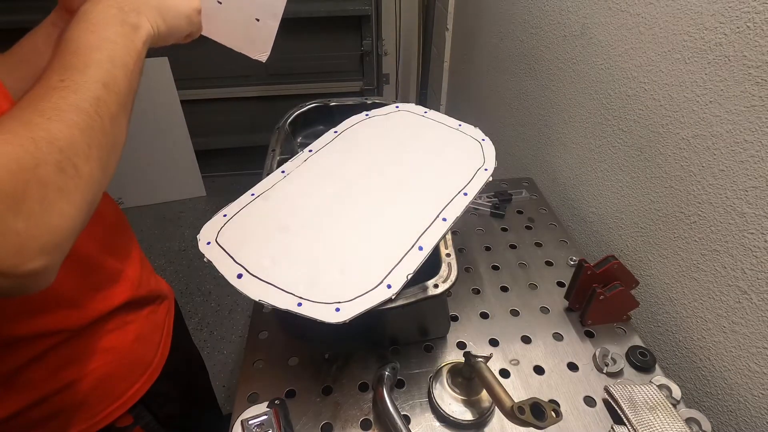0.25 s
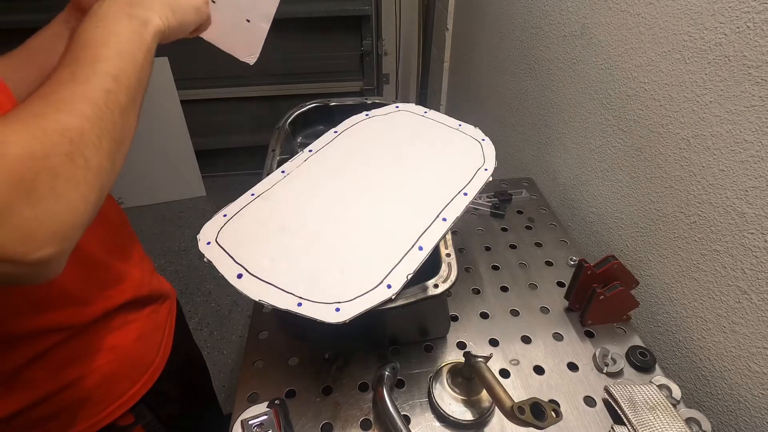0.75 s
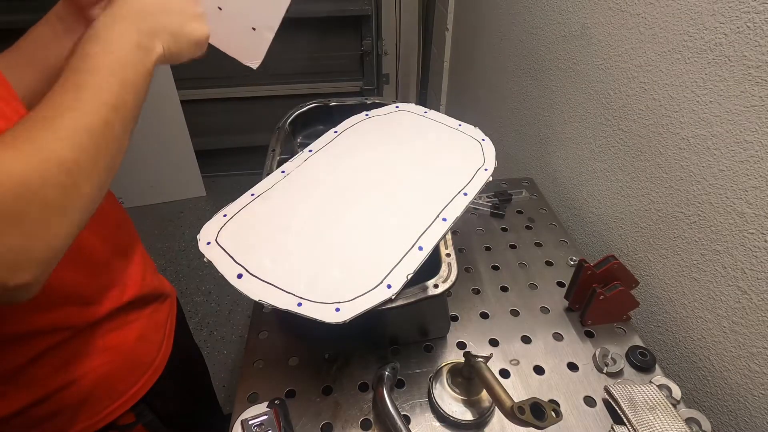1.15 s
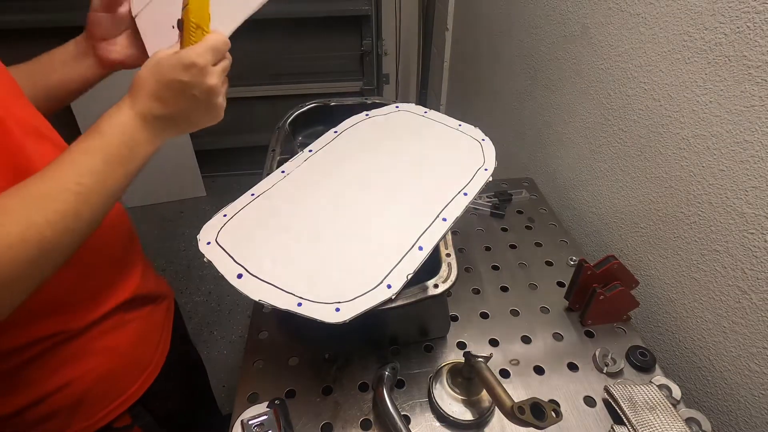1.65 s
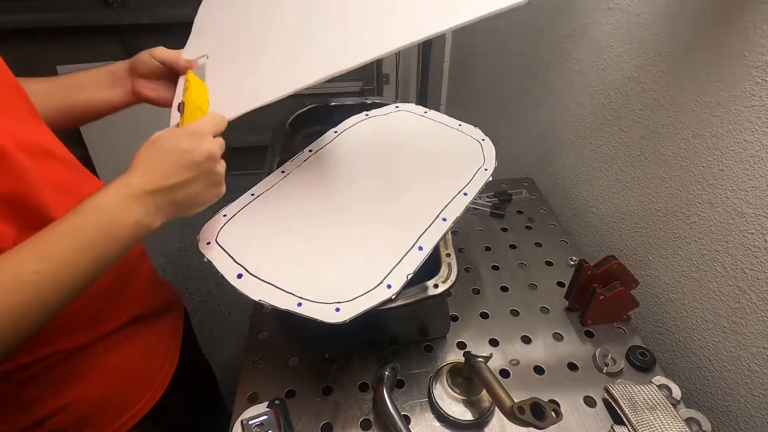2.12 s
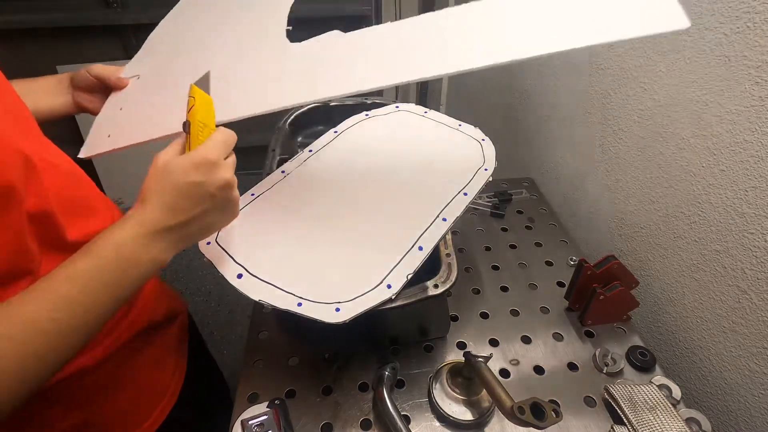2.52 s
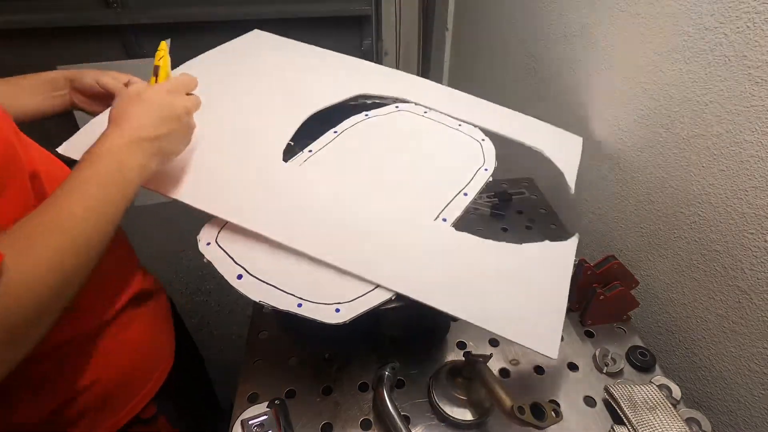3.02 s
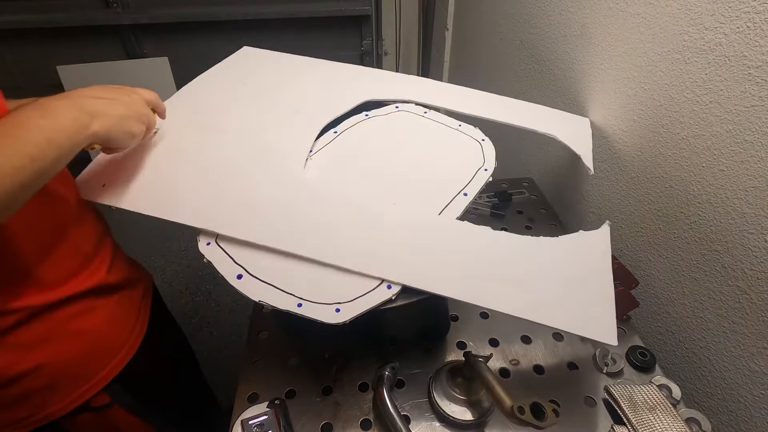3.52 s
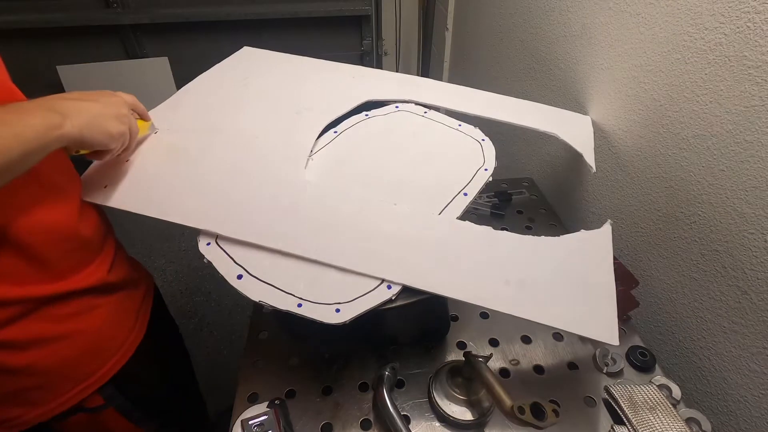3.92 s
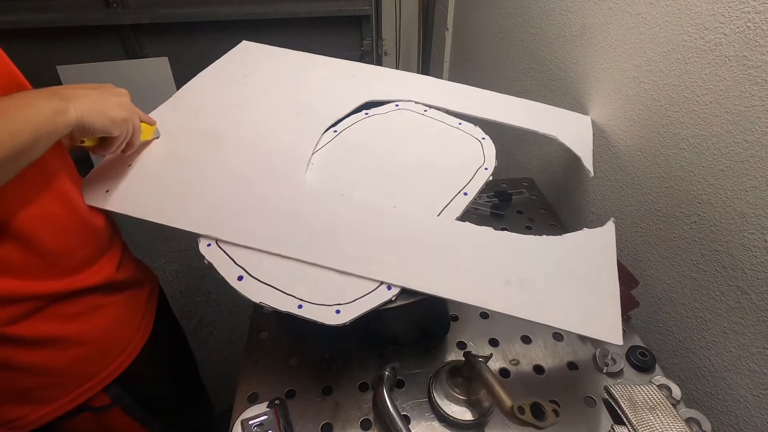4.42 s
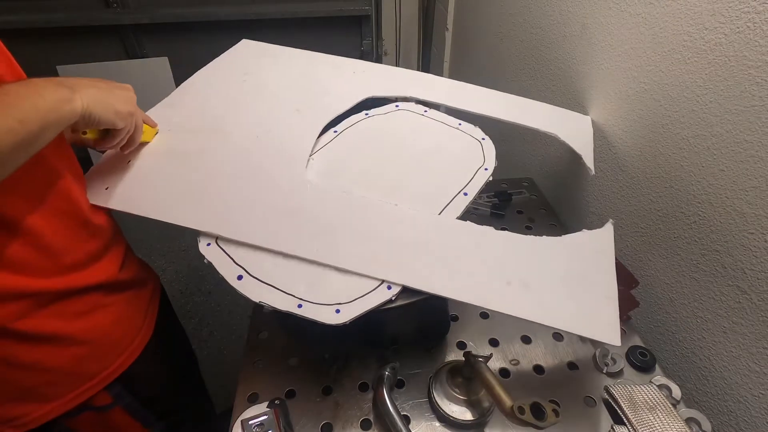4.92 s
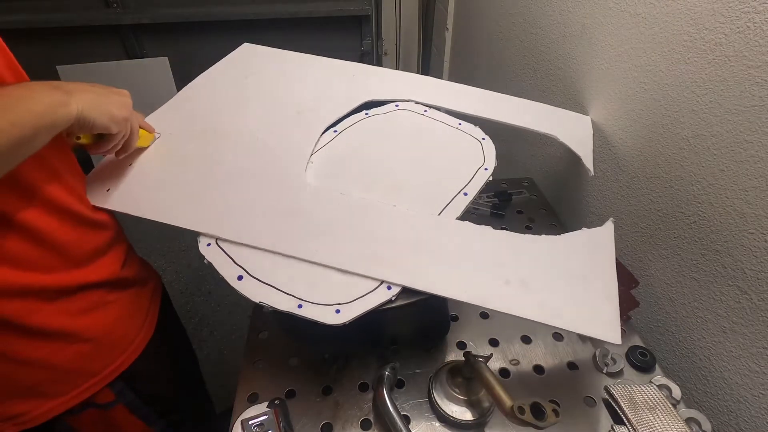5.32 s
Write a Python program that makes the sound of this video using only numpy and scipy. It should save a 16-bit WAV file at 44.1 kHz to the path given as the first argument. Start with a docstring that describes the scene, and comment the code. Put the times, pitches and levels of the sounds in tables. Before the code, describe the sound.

Close stereo pickup of a big cardboard sheet in a tight, lightly echoing garage: soft scuffs and crinkles first, one bright click, a loud floppy thump, then a rapid run of hollow slaps as it lands on a pan. Quiet rubbing and low dragging follow, ending with abrupt gritty knife strokes, crackles and dull knocks over a soft rumble.

```python
"""A large sheet of cardboard is bumped, lands on a metal oil pan and bounces: each blow is a sum of
decaying noise bursts (thud, slap, crack), coloured by the sheet's resonances.
Rubbing and tearing are random grains shaped by hand speed or by a stick-slip blade; snaps and ticks
are short bursts centred on one pitch. Low rumbling noise fills the small garage workshop, whose
echo is decaying noise, partly alike at two microphones."""
import sys
import numpy as np
from scipy import signal
from scipy.fft import rfft, irfft, next_fast_len
from scipy.io import wavfile
from scipy.ndimage import uniform_filter1d

SR = 44100
rng = np.random.default_rng(int(sys.argv[2]) if len(sys.argv) > 2 else 0)


def to_wav(s):
    """Save 16-bit WAV."""
    ch = np.atleast_2d(s).T  # columns
    pcm = np.round(np.clip(ch, -1, 1) * 32767)  # PCM
    wavfile.write(sys.argv[1], SR, pcm.astype(np.int16))


N = 244755
T = np.arange(N) / SR  # time axis in seconds
HZ = np.fft.rfftfreq(8192, 1 / SR)  # frequency grid of the filters

# All levels are relative; later gains and filters set the final balance.
# Background noise. Each row: frequency in Hz, power density in dB per Hz.
BACKGROUND_TONE = [(20, -20), (40, -3), (60, 3.5), (82, 8), (120, 0), (170, -9), (260, -17.5), (500, -38.5),
                   (1200, -34), (3000, -69), (8000, -48), (15000, -101)]
# Decay of the room echo. Each row: frequency in Hz, time to fall by 60 dB in seconds.
ROOM_T60 = [(80, 0.45), (300, 0.29), (1000, 0.43), (3000, 0.4047), (7000, 0.49), (14000, 0.24)]
# Coherence of the two microphones. Each row: frequency in Hz, left-right likeness (1 = identical).
LIKENESS = [(250, 0.98), (500, 0.74), (1000, 0.62), (2000, 0.44), (4000, 0.11), (11000, 0.083)]
# Colour difference of the microphones. Each row: frequency in Hz, left minus right in dB
# (before each side is scaled to unit energy).
BALANCE = [(100, 2.9), (500, 1.9), (1000, 2.2), (2000, 4.5), (4000, 4.5), (9000, 0.82), (18000, 0.89)]
# Resonances of the sheet. Each row: frequency in Hz, width in Hz, lift in dB when held in the air,
# lift in dB when resting on the pan.
SHEET_MODES = [(184.6, 220, 7, 2), (266.4, 54, -1.5, 8), (365.5, 90, 4.5, -8), (486, 89, 4, 2),
               (1200, 210, 6, -2), (1580, 110, 0, 2), (3500, 190, -2, 2)]

# Card gliding through the hands as it is lifted. Each row: time in seconds, level in dB.
LIFTING = [(0.0, -80), (0.12, -58), (0.26, -56.5), (0.33, -56.5), (0.7, -67), (0.98, -68), (1.24, -65.5),
           (1.72, -68.5), (1.87, -53.5), (2.0, -60)]
# Card gliding through the hands as it is laid down. Each row: time in seconds, level in dB.
LAYING = [(2.45, -103), (2.62, -74), (2.83, -49.5), (3.01, -55.5), (3.55, -54), (3.73, -62), (3.86, -78.5),
          (4.55, -59.5), (4.7, -58.5)]
# Low groan of the sheet dragging on the rim of the pan. Each row: time in seconds, level in dB.
DRAGGING = [(3.25, -50.5), (3.392, -55), (3.42, -47.5), (3.896, -66.5), (3.95, -54.5), (4.118, -48),
            (4.22, -65), (4.346, -48), (4.616, -55.5), (4.72, -42)]
# Quick scuffs as a hand changes its grip. Each row: start in seconds, length in seconds, level in dB.
GRIP_SCUFFS = [(0.064, 0.099, -46), (1.064, 0.068, -40), (1.376, 0.045, -52), (1.498, 0.22, -40.5),
               (2.03, 0.062, -34.5), (2.129, 0.04, -36), (2.562, 0.026, -52), (2.646, 0.067, -53.5),
               (3.907, 0.079, -47.5)]
# Sliding card. Each row: frequency in Hz, power density in dB per Hz.
SLIDE_TONE = [(150, -20), (400, -2.5), (700, -9.5), (1200, -3), (2200, -5), (4200, -6.5), (7000, -11.5),
              (9500, -22.5), (12500, -23.5), (15500, -27)]
# A palm sweeping over the sheet. Each row: start in seconds, length in seconds, level in dB.
PALM_SWEEPS = [(3.192, 0.11, -42), (3.337, 0.19, -45)]
# Gritty hiss of the palm. Each row: frequency in Hz, power density in dB per Hz.
PALM_TONE = [(500, 1.5), (1500, 1), (5500, 1.5), (9000, -10), (12000, -14.5), (15500, -19)]

# Snaps and crinkles of the card. Each row: start in seconds, level in dB, pitch in Hz.
SNAPS = [(.218, -36.5, 3150), (.253, -28, 2450), (0.369, -34.5, 2680), (.51, -33.5, 3380),
         (.731, -38.5, 2700), (.92, -44, 4730), (1.086, -29.5, 2880), (1.108, -32.5, 1700),
         (1.377, -39, 2880), (1.527, -33.5, 1980), (1.864, -33.5, 3630), (2.815, -28, 4800),
         (2.875, -25.5, 2980), (2.909, -37, 1840), (4.302, -38.5, 4160), (4.38, -39, 2000),
         (4.425, -38.5, 2710), (4.544, -37.5, 2600), (4.715, -32, 2930), (5.194, -34, 2630),
         (5.224, -32, 6500), (5.329, -26, 2120), (5.499, -34, 3000)]
# Clear ticks from the knife and the bending card. Each row: start in seconds, level in dB, pitch in Hz.
HARD_TICKS = [(1.1474, -16, 4040), (1.957, -33, 6760), (2.063, -19, 3200), (3.619, -34, 5870),
              (3.673, -30.5, 3070)]
# Strokes of the blade. Each row: start in seconds, end in seconds, tearing level in dB,
# level of the sheet's flexing in dB.
BLADE_STROKES = [(4.743, 4.778, -20, -21.5), (4.834, 5.059, -46.5, -71), (5.183, 5.229, -35, -34.5),
                 (5.319, 5.351, -43, -31), (5.476, 5.509, -40.5, -43), (5.506, 5.58, -31.5, -30)]
# Tearing card. Each row: frequency in Hz, power density in dB per Hz.
TEAR_TONE = [(200, -24.5), (450, 9), (700, -8.5), (930, 11), (1450, 5), (1900, 2), (3000, 5.5), (5200, -7),
             (7000, -5.5), (9000, -14.5), (12000, -19), (15500, -21)]

# Single blows on the sheet. Each row: start in seconds, strength in dB, hardness in dB.
BLOWS = [(0.088, -44.5, -3), (0.117, -45.5, 5), (1.014, -44, 8.5), (1.428, -34.5, -8.5),
         (1.525, -30.5, -10), (2.011, -15, -1), (2.029, -19.5, -1), (2.071, -25, 2), (2.09, -23, -1.5),
         (2.152, -28.5, -12), (2.826, -20, -5), (2.845, -21.5, -6), (2.874, -17, -4), (2.909, -19, 4.5),
         (2.945, -23.5, -18), (2.966, -21.5, -15), (3.001, -29.5, 3), (3.04, -23.5, -5.5),
         (3.408, -36.5, 7), (3.448, -35.5, -14), (4.036, -39.5, 5.5), (4.056, -37.5, 1), (4.313, -44, -3),
         (4.428, -41.5, 1.5), (4.546, -49, 6.5), (4.712, -34.5, -2), (4.787, -22.5, -1.5),
         (4.827, -26.5, -1), (5.071, -29, 7), (5.177, -32.5, -11), (5.239, -32.5, 1.5), (5.37, -30, 7),
         (5.487, -26, -6.5)]
# Thud of the whole sheet in a blow. Each row: frequency in Hz, power density in dB per Hz.
THUD_TONE = [(20, -52), (50, -5.5), (95, -5.5), (200, -2.5), (290, -3.5), (450, -10), (650, -14.5),
             (1500, -69.5)]
# Slap of the face in a blow. Each row: frequency in Hz, power density in dB per Hz.
SLAP_TONE = [(150, -17), (420, -8.5), (750, 5.5), (1250, 3), (1900, -6.5), (3000, -16.5), (8000, -60.5)]
# Crack of the edge in a blow. Each row: frequency in Hz, power density in dB per Hz.
CRACK_TONE = [(600, -3), (1800, 9), (3300, 4.5), (5000, 1), (7500, -12.5), (12000, -24), (15500, -21)]
# Deep whumps of the whole sheet bowing. Each row: start in seconds, level in dB.
SHEET_WHUMPS = [(1.431, -25.5), (2.01, -21), (4.783, -21.5)]
# Colour of a whump. Each row: frequency in Hz, power density in dB per Hz.
WHUMP_TONE = [(20, 0.5), (55, 16.5), (95, -2), (150, 13.5), (220, -10.5), (600, -41)]

LANDS_AT_S = 2.8  # the sheet comes to rest on the pan
SCUFF_RISE_S = 0.025
BOOM_HZ, BOOM_DECAY_S = 265.9, 0.041  # across the pan, the sheet booms like a drum skin
SNAP_CYCLES = 14.2  # cycles of its pitch over which a snap's envelope falls to 1/e
EDGE_HZ = 15500  # upper band limit


def amp(db):
    """Decibel law: amplitude ratio for a level in dB."""
    return 10 ** (np.asarray(db) / 20)


def evened(x):
    """Normalisation to unit root-mean-square value."""
    return x / np.sqrt(np.mean(x ** 2) + 1e-20)


def read(points, hz):
    """Interpolation of a spectrum by straight lines on a log-frequency axis."""
    f, value = np.transpose(points)
    return np.interp(np.log(hz + 1), np.log(f + 1), value)


def add(mix, s, sound):
    """Superposition: adds a sound to the mix from s seconds on."""
    part = mix[max(round(s * SR), 0):][:len(sound)]
    part += sound[:len(part)]


def colour(x, db):
    """Minimum-phase filtering: causal, of unit energy, with relative gain db on the grid HZ."""
    size = len(HZ) - 1
    cepstrum = irfft(np.log(amp(np.maximum(db, -100))))[:size]  # the causal half
    cepstrum[0] = 0
    taps = irfft(np.exp(2 * rfft(cepstrum, 2 * size)))[:size]
    return signal.fftconvolve(x, taps / np.linalg.norm(taps))[:len(x)]


def flattened(x, span_hz, size=4096):
    """Spectral whitening: evens out broad peaks and dips and keeps the fine ones."""
    count = 8 * size
    power = uniform_filter1d(abs(rfft(x, count)) ** 2, max(round(span_hz * count / SR), 1))
    power = np.interp(HZ, np.fft.rfftfreq(count, 1 / SR), power)
    return colour(x, -10 * np.log10(power + 1e-12))


def smooth_noise(size):
    """Slow random fluctuation: noise averaged over `size` samples, at unit rms."""
    return evened(uniform_filter1d(rng.standard_normal(N), size=size))


def pair(a, b, hz):
    """Partial coherence: two microphones hear similar bass but different treble."""
    same = np.clip(read(LIKENESS, hz), -1, 1)
    mid = np.sqrt((1 + same) / 2) * a
    side = np.sqrt((1 - same) / 2) * b
    return np.array([mid + side, mid - side])


def background(rumble_db=-45):
    """Stationary noise: random phases under a low rumble and a trace of hiss."""
    size = next_fast_len(N)
    hz = np.fft.rfftfreq(size, 1 / SR)
    a, b = rfft(rng.standard_normal((2, size))) * amp(read(BACKGROUND_TONE, hz))
    return amp(rumble_db) * evened(irfft(pair(a, b, hz), size)[:, :N])


def garage(x, wet_db, build_s=0.00035):
    """Reverberation: direct sound, one sample earlier on the right, and the dense echo of close walls."""
    hz, t, z = signal.stft(rng.standard_normal((2, SR)), SR, nperseg=256)
    z = pair(*z, hz[:, None]) * amp(-60 * t / read(ROOM_T60, hz)[:, None])
    tail = signal.istft(z, SR, nperseg=256)[1][:, :SR] * (1 - np.exp(-T[:SR] / build_s))
    paths = amp(wet_db) * tail / np.linalg.norm(tail[0])
    paths[[0, 1], [1, 0]] += 1  # direct sound: left at sample 1, right at sample 0
    ears = []
    for path in paths:
        response = np.linalg.norm(path) * evened(flattened(path, 103)) / np.sqrt(SR)
        ears.append(signal.fftconvolve(x, response)[:N])
    return np.array(ears)


def bump(hz, width):
    """Resonance curve: a Lorentzian of unit height, `width` Hz across at half height."""
    return 1 / (1 + (2 * (HZ - hz) / width) ** 2)


def sheet_db(on_pan=True):
    """Resonance: the lift in dB that the ringing sheet gives to what excites it."""
    lift = 0
    for hz, width, held_db, resting_db in SHEET_MODES:
        lift = lift + (resting_db if on_pan else held_db) * bump(hz, width)
    return lift


def ripple():
    """Modal overlap: many small, well damped resonances of a stiff sheet, as a unit-rms spectrum."""
    waves = uniform_filter1d(uniform_filter1d(rng.standard_normal(len(HZ)), size=26), size=20)
    return evened(np.tanh(evened(waves)))


def grains(per_s, spread_db):
    """Random impulses: fibres let go one by one, a few much harder than the rest."""
    sizes = amp(spread_db * np.minimum(rng.exponential(1, N), 4))
    return evened(rng.choice([-1., 1.], N) * sizes * (rng.random(N) < per_s / SR))


def burst(decay_s, tone_db, rattle_db=3, size=10000):
    """Damped contact noise: an unevenly chattering contact that decays from nominal unit level."""
    rattle = amp(rattle_db * evened(uniform_filter1d(rng.standard_normal(size), size=90)))
    chatter = rng.standard_normal(size) * rattle * np.exp(-T[:size] / decay_s)
    x = colour(flattened(chatter, 260), tone_db)
    return x / np.linalg.norm(x) * np.sqrt(decay_s * SR / 2)


def travelling(x, tone_db, ripple_db, dwell_s, count=6):
    """Moving excitation: contact passes from spot to spot, and each spot rings in its own way."""
    pace = np.exp(.5 * smooth_noise(5000))
    place = np.cumsum(pace) / SR / dwell_s
    out = np.zeros(N)
    for k in range(count):
        nearness = np.maximum(1 - abs((place - k) % count - 1), 0)
        out += colour(x * np.sqrt(nearness), tone_db + ripple_db * ripple())  # equal-power crossfade
    return out


def gesture(points, fade_s=0.19):
    """Envelope: gain follows a curve of seconds and dB and decays exponentially outside it."""
    s, db = np.transpose(points)
    outside = abs(T - np.clip(T, s[0], s[-1]))
    return amp(np.interp(T, s, db)) * np.exp(-outside / fade_s)


def sweeps():
    """Friction: skin dragging over fibres excites a bright grit that swells and fades."""
    speed = np.zeros(N)
    for start, length, db in PALM_SWEEPS:
        add(speed, start, amp(db) * np.sqrt(np.hanning(round(length * SR))))
    return colour(speed * grains(per_s=5800, spread_db=2.5), read(PALM_TONE, HZ))


def hand_speed(glide_db=-2.0, scuff_db=-3.0, fade_power=0.74):
    """Speed-driven friction: steady gliding, and scuffs that swell quickly and slow to a stop."""
    speed = amp(glide_db) * (gesture(LIFTING) + gesture(LAYING))
    for start, length, db in GRIP_SCUFFS:
        t = T[:round(length * SR)]
        swell = np.minimum(t / SCUFF_RISE_S, 1)
        slowing = np.maximum(1 - t / length, 0) ** fade_power
        add(speed, start, amp(db + scuff_db) * swell * slowing)
    return speed


def sliding(hiss_db=-2.0, held_db=-13, drag_db=-3.0, scuff_db=-10, crackle_db=-5, uneven_db=4.5, catch_db=6.5):
    """Sliding friction: fibres rustle with a shifting grain; the sheet groans in the hands and on the pan."""
    hiss = hand_speed()
    grip = amp(uneven_db * smooth_noise(700))
    crackles = amp(crackle_db) * grains(per_s=450, spread_db=4.0)
    fibres = amp(hiss_db) * (grains(per_s=13000, spread_db=0.5) + crackles)
    rub = rng.standard_normal(N)

    body_db = np.maximum(read(THUD_TONE, HZ), read(SLAP_TONE, HZ) + scuff_db)
    held = colour(hiss * rub * (T < LANDS_AT_S), body_db + sheet_db(on_pan=False))

    catches = evened(amp(catch_db * smooth_noise(2500)))
    groan_db = read(THUD_TONE, HZ) + 1.94 * sheet_db()  # dragging stresses the resonances
    dragged = travelling(gesture(DRAGGING) * catches * rub, groan_db, ripple_db=3, dwell_s=0.12)

    rustle = travelling(hiss * grip * fibres, read(SLIDE_TONE, HZ), ripple_db=2, dwell_s=0.071)
    return rustle + amp(held_db) * held + amp(drag_db) * dragged


def ticks(focus_db=36, spread=0.79, level_db=-4.0, decay_s=0.002):
    """Brief impact: a hard tick is a very short burst with a narrow spectral peak."""
    out = np.zeros(N)
    for s, db, hz in HARD_TICKS:
        tone = focus_db / (1 + (np.log((HZ + 1) / hz) / spread) ** 2)
        add(out, s, amp(db + level_db) * burst(decay_s, tone))
    return out


def snaps(focus_db=27, level_db=-4.0, ring_db=3):
    """Local resonance: papery snaps, each centred on its own pitch and ringing its own spot."""
    out = np.zeros(N)
    for s, db, hz in SNAPS:
        tone = focus_db / (1 + np.log((HZ + 1) / hz) ** 2) + ring_db * ripple()
        add(out, s, amp(db + level_db) * burst(SNAP_CYCLES / hz, tone))
    return out


def cuts(rise_s=0.017, fall_s=0.011, slips_per_s=162, jitter=0.392, slip_db=7, tear_db=-1, flex_db=-3.0):
    """Stick-slip: the blade catches and slips, tearing fibres in clumps and shaking the sheet."""
    tear, flex = np.zeros((2, N))
    for start, end, tearing_db, flexing_db in BLADE_STROKES:
        push = np.clip((T - start) / rise_s, 0, 1) * np.exp(-np.maximum(T - end, 0) / fall_s)
        tear += amp(tearing_db) * push
        flex += amp(flexing_db) * push
    rate = slips_per_s * (1 + jitter * smooth_noise(200))
    slips = evened(amp(slip_db * np.cos(2 * np.pi * np.cumsum(rate) / SR)))
    fibres = tear * slips * grains(per_s=5000, spread_db=1.5)
    tearing = travelling(fibres, read(TEAR_TONE, HZ) + sheet_db(), ripple_db=2.5, dwell_s=.01)
    flexing = colour(flex * grains(per_s=1000, spread_db=4.0), read(THUD_TONE, HZ) + sheet_db())
    return amp(tear_db) * tearing + amp(flex_db) * flexing


def blow(s, strength_db, hardness_db, slap_db=-3, crack_db=-15, crack_per_hardness=0.16, thud_db=1.0,
         thud_decay_s=0.037, slap_decay_s=0.017, crack_decay_s=0.031, linger=0.34, spot_db=3.0):
    """Impact: the sheet thuds; hardness adds slap and crack, and a light blow is over sooner."""
    upper = HZ > 2 * SHEET_MODES[0][0]  # the upper ring depends on the spot
    ring = sheet_db(on_pan=s > LANDS_AT_S) + spot_db * ripple() * upper
    contact = amp(linger * strength_db)  # scales all three decay times
    parts = [(THUD_TONE, thud_db, thud_decay_s),
             (SLAP_TONE, slap_db + hardness_db, slap_decay_s),
             (CRACK_TONE, crack_db + crack_per_hardness * hardness_db, crack_decay_s)]
    total = np.zeros(10000)
    for tone, db, decay_s in parts:
        total += amp(db) * burst(decay_s * contact, read(tone, HZ) + ring)
    return amp(strength_db) * total


def knocks(boom_db=-8.0):
    """Impact and free vibration: blows, a damped boom on the pan, and whumps of the sheet bowing."""
    out = np.zeros(N)
    t = T[:SR // 2]
    boom = amp(boom_db) * np.exp(-t / BOOM_DECAY_S) * np.sin(2 * np.pi * BOOM_HZ * t)
    for s, strength_db, hardness_db in BLOWS:
        add(out, s, blow(s, strength_db, hardness_db))
        if s > LANDS_AT_S:
            add(out, s, amp(strength_db) * boom)
    for s, db in SHEET_WHUMPS:
        add(out, s, amp(db) * burst(0.011, read(WHUMP_TONE, HZ)))
    return out


def scene():
    """Superposition: all sources share one small room, each with its own share of echo."""
    rubbing = garage(sliding() + sweeps(), wet_db=0)
    snapping = garage(snaps(), wet_db=-5.0) + garage(ticks(), wet_db=-6.5)
    cutting = garage(cuts(), wet_db=0.5)
    knocking = garage(knocks(), wet_db=1.0)
    return background() + rubbing + snapping + cutting + knocking


def record(dry, top_hz=13000):
    """Linear filtering: two microphones differ in colour and lose top treble; then the band limit."""
    tilt_db = read(BALANCE, HZ)
    ports = np.array([colour(x, side * tilt_db) for x, side in zip(dry, (.5, -.5))])
    ports = signal.sosfilt(signal.butter(N=3, Wn=top_hz, fs=SR, output="sos"), ports)
    band_limit = signal.firwin(511, EDGE_HZ, window=("kaiser", 9), fs=SR)
    return signal.oaconvolve(ports, band_limit[None], "same")


dry = scene()
out = record(dry)
to_wav(out)
```